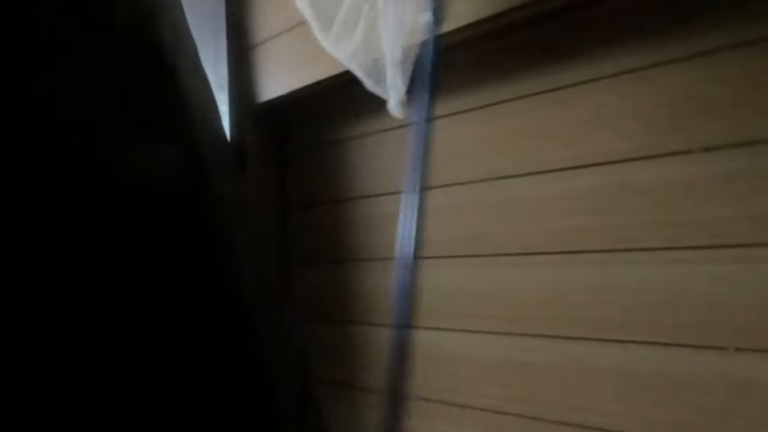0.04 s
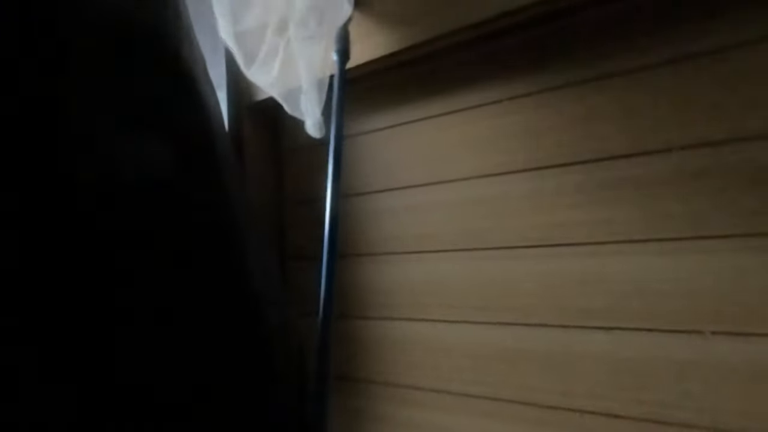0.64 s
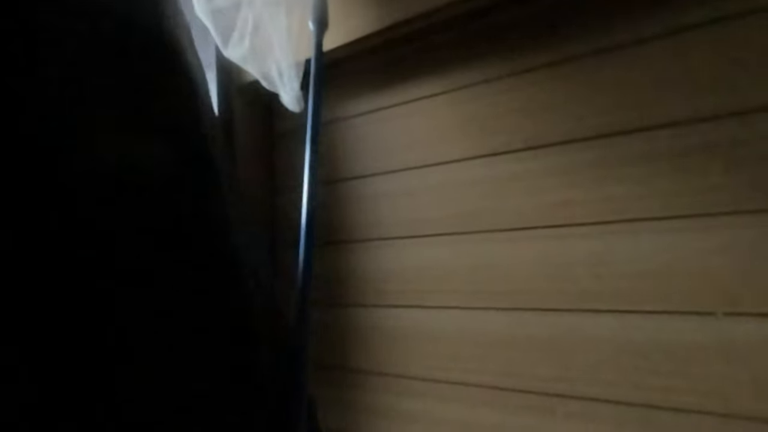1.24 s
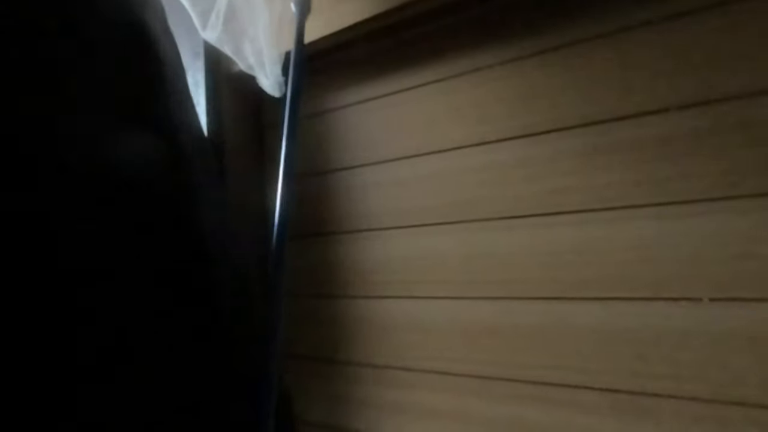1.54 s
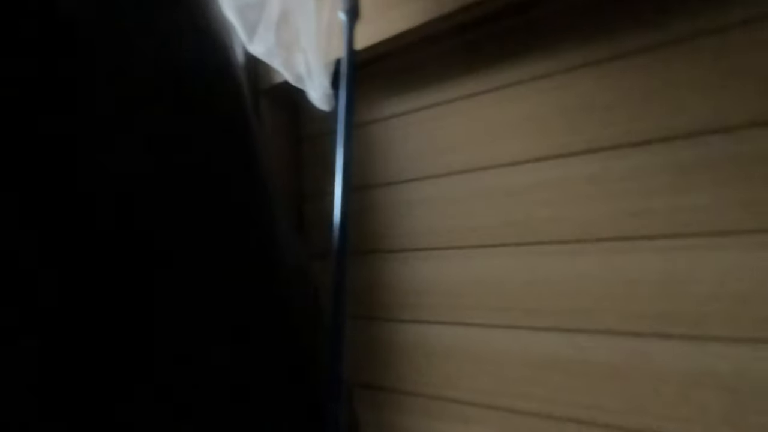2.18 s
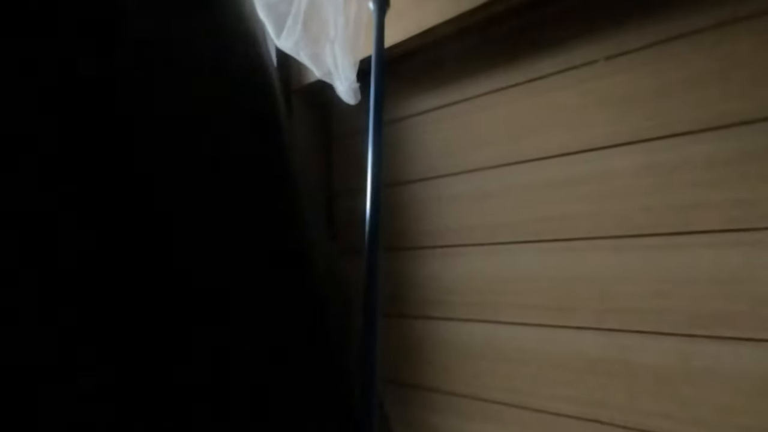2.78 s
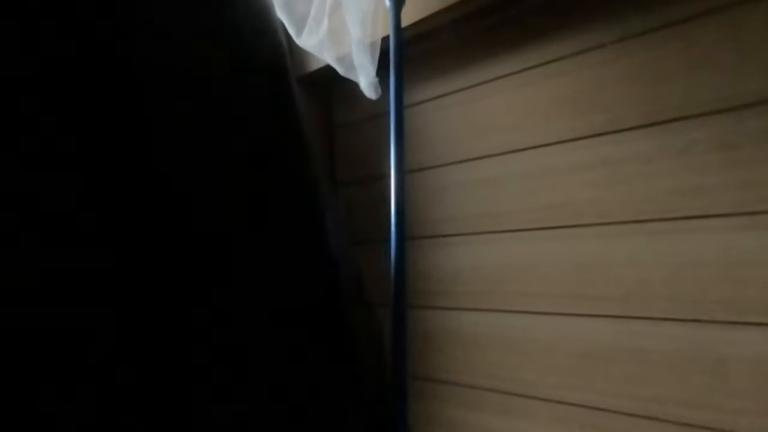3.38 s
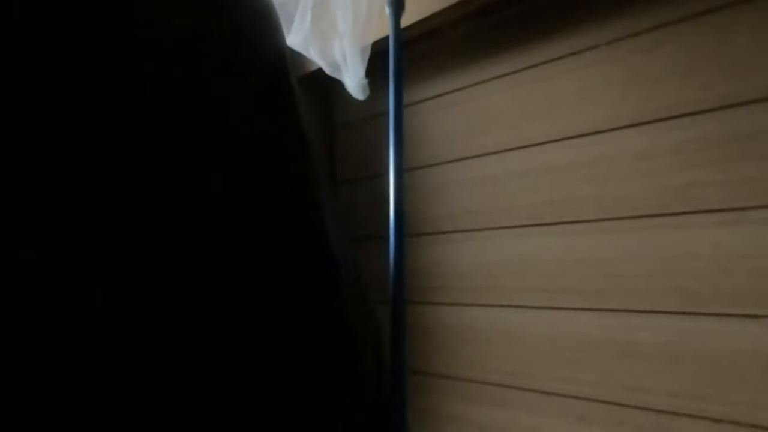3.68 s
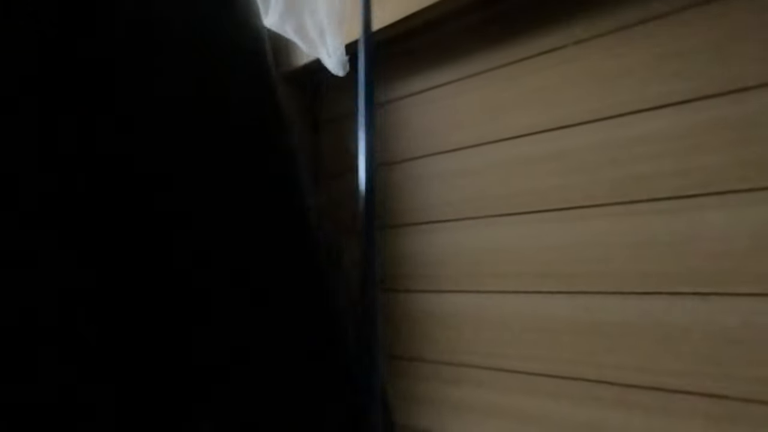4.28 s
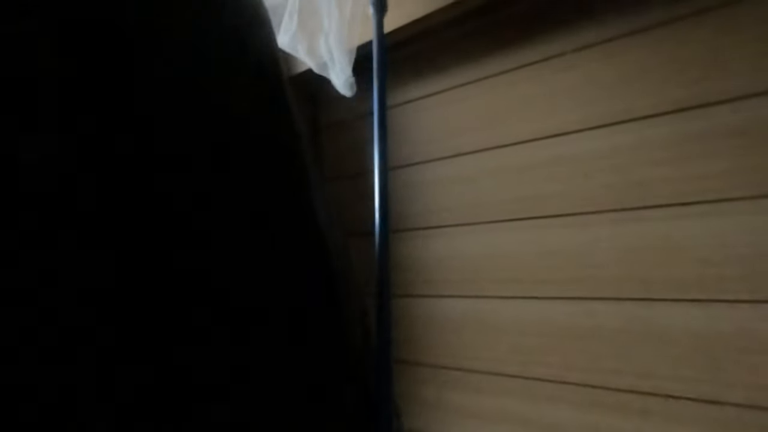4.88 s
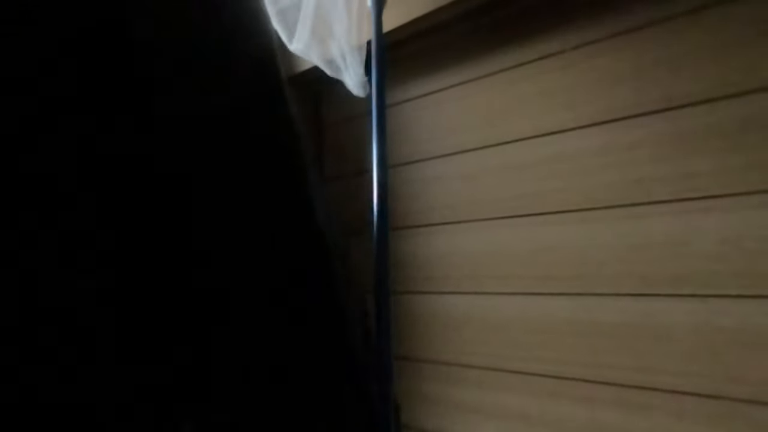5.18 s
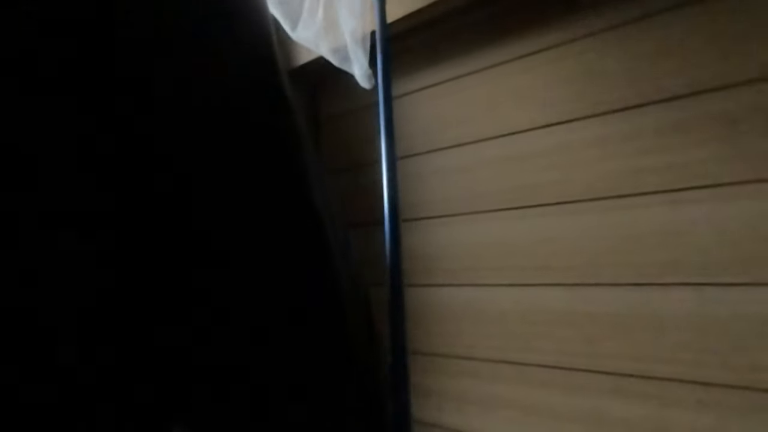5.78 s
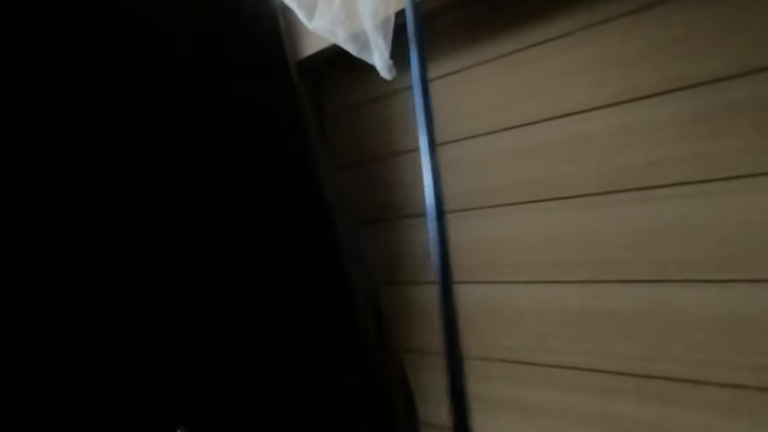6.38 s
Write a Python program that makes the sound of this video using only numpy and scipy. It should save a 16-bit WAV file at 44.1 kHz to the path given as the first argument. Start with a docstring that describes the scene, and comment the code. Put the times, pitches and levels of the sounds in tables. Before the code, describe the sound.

An insect net works along wooden wall boards close to the microphone, indoors. It starts with light knocks, rubbing and a short clatter, then falls nearly quiet. A firm knock follows, then a tiny squeak, a loud hollow bang and some smaller taps, and finally two hard bangs in quick succession. Soft scrapes of the frame and rustles of mesh fill the gaps, with a faint room hiss throughout.

```python
"""Insect net against a plank wall

A small room, with a phone's two microphones close to the wall. The net's pole and frame knock on the
boards, which boom and ring; the hardest blows overload the microphones. Between blows the frame scrapes
along the wood and squeaks once, and the mesh swishes, over a faint steady hiss."""
import sys
import numpy as np
from scipy import signal
from scipy.fft import rfft, irfft
from scipy.io import wavfile
from scipy.ndimage import uniform_filter1d

SR = 44100
rng = np.random.default_rng(int(sys.argv[2]) if len(sys.argv) > 2 else 0)


def generate_wav(sig):
    """Save sig (samples, or channels by samples) to the path in sys.argv[1] as 16-bit PCM at SR."""
    pcm = np.round(np.clip(np.atleast_2d(sig).T, -1, 1) * 32767).astype(np.int16)
    wavfile.write(sys.argv[1], SR, pcm)


N = 287973
RING_SAMPLES = 32768  # time given to one blow to die away

# Blows on the wall, close to the phone: start_s, level_db, contact_hz (low = soft),
# bass_cut_hz (high = glancing), click_db (relative to the wall's sound)
BLOWS = [(0.006, -43, 336, 85, -37), (0.1056, -18.5, 1680, 410, -16), (0.197, -26, 300, 310, -41),
         (0.7251, -33, 2010, 700, -29), (0.8213, -31.5, 1200, 27, -27), (0.833, -14.5, 473, 17, -30),
         (0.841, -27.5, 1500, 230, -19), (0.8701, -24, 2400, 450, -14), (3.2355, -14.5, 1920, 230, -15.5),
         (3.9565, -7, 2220, 80, -16.5), (4.362, -53.5, 1500, 340, -6), (4.378, -28, 850, 320, -27),
         (4.411, -26.5, 1270, 120, -21.5), (4.421, -19, 1660, 200, -38), (4.477, -47, 900, 240, -12),
         (4.5455, -31, 734, 160, -29.5), (4.569, -29, 390, 300, -35), (5.015, -52, 1500, 800, -27),
         (5.053, -38.5, 420, 290, -31), (5.3979, -8, 1580, 91, -25.5), (5.5702, -7, 3000, 126, -17)]
# Resonances of the planks: pitch_hz, peak_db, t60_s
PLANK_MODES = [(73, -6, .8), (84, -14, .6), (164, 2, .27), (183, -4, .21), (214, 1, .24), (258, -4, .22),
               (291, -1, .22), (318, -8, .19), (345, -10, .2), (409, -5, .19), (480, -9, .16),
               (546, -5, .15), (585, -12, .13), (682, -8, .13), (730, -14, .13), (830, -15, .1),
               (865, -11, .12), (950, -16, .11), (1065, -9, .11), (1135, -10, .09), (1192, 0, .115),
               (1248, -8, .1), (1433, -11, .11), (1564, -14, .08), (1645, -21, .08), (1993, -19, .075),
               (2115, -22, .055)]


def knocks(mode_db=-6.5, dense_db=-6, push_db=-6, return_db=-3.5, hard_db=-10, span_s=0.03):
    """Each blow pushes the wall and leaves it ringing; a soft one loses treble, a glancing one bass."""
    out = np.zeros((2, N + RING_SAMPLES))
    push = undb(push_db) * board_push()
    # after a hard blow the pole drops back with a dull thud, which fades for blows below hard_db
    drop_back = delay(cut(push, 300, "low", order=2), s=0.0395)
    for start_s, level_db, contact_hz, bass_cut_hz, click_db in BLOWS:
        thuds = push + undb(return_db + 0.7 * min(level_db - hard_db, 0)) * drop_back
        wall = thuds + undb(mode_db) * struck_modes(PLANK_MODES) + undb(dense_db) * dense_ring()
        wall = cut(wall, contact_hz, "low", order=2)
        wall = cut(wall, bass_cut_hz, "high", order=1)
        blow = unit(wall) + undb(click_db) * pole_click()
        gain = undb(level_db) * np.sqrt(span_s * SR / RING_SAMPLES)  # level is energy spread over span_s
        start = int(start_s * SR)
        out[:, start:start + RING_SAMPLES] += gain * blow
    return out[:, :N]


# Spectrum of the first push on a board: freq_hz, density_db
PUSH_SPECTRUM = [(30, -23), (105, -28.5), (150, 13), (300, 7), (480, -0.5), (750, -9.5), (1200, 3.5),
                 (1700, -24.5), (2700, -40.5), (15000, -24)]


def board_push(rebound_s=0.003666, rebound_share=0.5, floor_s=0.011, floor_share=0.35):
    """The board gives way in one short wave, swings again and is mirrored by the floor."""
    impulse = np.tile(signal.unit_impulse(RING_SAMPLES), (2, 1))
    wave = causal_colour(impulse, PUSH_SPECTRUM)
    return -unit(wave + rebound_share * delay(wave, rebound_s) + floor_share * delay(wave, floor_s))


def struck_modes(table, scatter_db=1.44, detune=0.0062, travel_s=0.001246):
    """A struck body rings; every contact point weights the modes a little differently."""
    t, out = np.arange(RING_SAMPLES) / SR, 0
    for k, (hz, peak_db, t60_s) in enumerate(table):
        pitch_draw, level_draw, phase_draw = rng.standard_normal(3)
        decay = np.log(1000) / t60_s
        mic_phase = np.arctan(undb(at(MIC_WIDTH, hz))) * phase_draw * np.array([[1], [-1]])
        ring = np.cos(2 * np.pi * hz * (1 + detune * pitch_draw) * t + mic_phase) * np.exp(-decay * t)
        # neighbouring modes swing against each other, so the ring builds up over a few ms
        out = out + (-1) ** k * undb(peak_db + scatter_db * level_draw) * decay * ring
    return unit(delay(out, travel_s))


# Dense small resonances of the wall and the room around it: freq_hz, density_db
DENSE_SPECTRUM = [(30, -65), (70, -2), (100, -24.5), (160, -1), (300, -5), (450, -5.5), (800, -7.5),
                  (1200, -19), (1500, -2), (2000, -40), (2700, -29), (4000, -36.5), (9000, -36),
                  (15000, -66)]
# Their decay: freq_hz, t60_s
DENSE_DECAY = [(60, 0.59), (160, 0.34), (420, 0.21), (1100, 0.11), (2900, 0.14), (8000, 0.1)]


def dense_ring():
    """Countless small resonances die away in half-octave bands; the lows stay longest."""
    t, out = np.arange(RING_SAMPLES) / SR, 0
    noise = rfft(mic_noise(RING_SAMPLES))
    octave = np.log2(np.maximum(freqs(t), 1))
    for hz in 40 * 2 ** np.arange(0, 9, .5):
        window = np.cos(np.pi / 2 * np.clip(2 * (octave - np.log2(hz)), -1, 1))
        band = irfft(noise * window, RING_SAMPLES) * np.exp(-np.log(1000) * t / at(DENSE_DECAY, hz))
        out = out + unit(band) * undb(at(DENSE_SPECTRUM, hz)) * np.sqrt(hz)
    return unit(out)


# Crack of the hard pole on wood, heard close: freq_hz, density_db
CRACK_SPECTRUM = [(200, -11.5), (1500, 19), (2100, 0), (2800, -1.5), (4000, 2.5), (5500, -7.5),
                  (8000, -12.5), (10000, -12.5), (12000, -26), (16000, -48)]
# Resonances of the hollow pole: pitch_hz, peak_db, t60_s
POLE_MODES = [(3210, -13, 0.033), (3775, 2.5, 0.043), (3940, 2, 0.029), (4150, 2, 0.035),
              (4460, -7.5, 0.037), (4890, -4.5, .035), (5600, -6.5, 0.043), (7200, -10, 0.039)]


def pole_click(fall_s=0.0017, tail_s=0.024, tail_db=-21, pole_db=-11, bounce_s=0.033, bounce_db=-26):
    """The hard pole cracks against the wood, rings for a moment and bounces once, faintly."""
    t = np.arange(RING_SAMPLES) / SR
    crack = unit(causal_colour(mic_noise(RING_SAMPLES) * np.exp(-t / fall_s), CRACK_SPECTRUM))
    # the room scatters the crack into a short, much quieter tail
    tail = unit(causal_colour(mic_noise(RING_SAMPLES) * np.exp(-t / tail_s), CRACK_SPECTRUM))
    tail *= np.sqrt(tail_s / fall_s)
    pole = struck_modes(POLE_MODES, scatter_db=0.5, detune=0.012, travel_s=0.00033)
    blow = crack + undb(tail_db) * tail + undb(pole_db) * pan(pole, left_db=2)
    return pan(blow + undb(bounce_db) * delay(blow, bounce_s), left_db=3)


# Strokes of the net along the wall: start_s, length_s, mesh_db, frame_db
NET_STROKES = [(0.034, 0.083, -60, -53), (0.096, 0.14, -51, -36.5), (.332, 0.085, -61.5, -47.5),
               (0.495, 0.1, -57, -44.5), (0.608, .13, -53.5, -39), (0.78, .11, -56.5, -43.5),
               (1.04, .085, -64, -52), (1.148, 0.13, -64, -48.5), (1.293, .18, -62.5, -50.5),
               (1.49, 0.19, -72, -56), (2.852, 0.029, -67, -51.5), (3.298, 0.052, -65, -52),
               (3.572, .085, -60.5, -52), (3.696, 0.071, -64, -52.5), (3.888, 0.11, -59.5, -48.5),
               (4.043, 0.086, -66.5, -52), (4.187, 0.076, -65, -53.5), (4.327, 0.15, -59, -53),
               (4.527, 0.047, -62, -46), (4.6, 0.065, -67, -50.5), (4.803, 0.039, -66, -53),
               (4.902, .055, -65, -50.5), (5.005, .07, -58.5, -49), (5.089, 0.07, -63, -50.5),
               (5.244, .055, -61.5, -51), (5.354, 0.12, -59, -46), (5.502, 0.14, -61, -46.5),
               (5.68, 0.041, -68, -53), (5.864, .05, -65, -55), (5.97, 0.036, -68, -56),
               (6.25, 0.1, -63, -51.5), (6.393, 0.13, -59, -48)]


def stroke_friction(attack_s=0.023, release_s=0.048, arch_db=3.5, lean_db=-59.5):
    """Strength of the mesh and frame friction: each stroke speeds up, swells at its middle and stops."""
    t, power = np.arange(N) / SR, np.zeros((2, N))
    for start_s, length_s, mesh_db, frame_db in NET_STROKES:
        moving = (t > start_s) & (t < start_s + length_s + release_s)
        age = t[moving] - start_s
        attack = np.minimum(age / attack_s, 1)
        release = np.minimum(1 - (age - length_s) / release_s, 1)
        arch = undb(arch_db * (np.sin(np.pi * age / (length_s + release_s)) - 1))
        power[:, moving] += (undb([[mesh_db], [frame_db]]) * attack * release * arch) ** 2
    power[1] += undb(lean_db) ** 2  # leaning on the wall, the frame rubs faintly even between strokes
    return np.sqrt(power)


# The frame dragging over the planks: freq_hz, density_db
SCRAPE_SPECTRUM = [(40, -34), (100, -7), (190, -2), (330, -4.5), (460, -12), (570, -6), (820, -14),
                   (1100, -6.5), (1560, -23), (2100, -27.5), (2700, -37.5), (3800, -37), (6000, -62),
                   (12000, -65)]


def frame_scrape(force, grain_db=2, judder_db=1, ring_db=-9, chafe_db=-6, light_touch_db=-54.5):
    """The frame catches on the grain in quick uneven slips, which also stir the boards."""
    slips = mic_noise(N) * undb(grain_db * walk(rate_hz=400) + judder_db * walk(rate_hz=35))
    rasp = unit(colour(slips, SCRAPE_SPECTRUM))
    boards = unit(signal.fftconvolve(slips, struck_modes(PLANK_MODES), axes=1)[:, :N])
    # a light touch only chafes the surface; pressing harder brings in the body of the wall
    chafe = unit(cut(cut(mic_noise(N), 1180, "high", order=4), 1210, "low", order=6))
    chafe /= 1 + force / undb(light_touch_db)
    return (rasp + undb(ring_db) * boards + undb(chafe_db) * chafe) * force


# The mesh brushing the wood, louder at the left microphone: freq_hz, density_db
SWISH_SPECTRUM = [(900, -16), (1500, 15), (2000, -1.5), (2700, 0.5), (3900, 7.5), (6000, -2.5),
                  (8000, -1.5), (10000, -2), (11500, -12), (15000, -19)]


def mesh_swish(force, gain_db=1, thread_db=0.5, flutter_db=0.5, folds_per_s=150, crinkle_s=0.0011):
    """Threads of the mesh flick over the wood in a fine dense rustle; small folds crinkle in it."""
    folds = (rng.random(N) < folds_per_s / SR) * rng.random(N)
    crinkles = undb(2) * signal.lfilter([1], [1, -np.exp(-1 / (crinkle_s * SR))], folds)
    threads = mic_noise(N) * undb(thread_db * walk(rate_hz=1500) + flutter_db * walk(rate_hz=42))
    rustle = unit(colour(threads * (1 + crinkles), SWISH_SPECTRUM))
    return pan(rustle, left_db=5.5) * force * undb(gain_db)


# Course of the frame's one faint squeak on the wall: time_s, pitch_hz, level_db
SQUEAK_PATH = [(3.76, 597, -60), (3.785, 622, -57), (3.81, 598, -40), (3.85, 554, -46.5),
               (3.89, 594, -47.5), (3.93, 600, -59)]


def frame_squeak(jitter=0.05, rough_db=2.5, board_db=-4):
    """The frame sticks and slips in a short, rough tone; its uneven slips shake the boards."""
    t = np.arange(N) / SR
    time_s, pitch_hz, level_db = np.transpose(SQUEAK_PATH)
    hz = np.interp(t, time_s, pitch_hz) * (1 + jitter * walk(rate_hz=300))
    tone = unit(sine(hz) * undb(rough_db * walk(rate_hz=110)))
    boards = unit(cut(cut(mic_noise(N), 260, "high", order=2), 440, "low", order=3))
    sounding = (t > time_s[0]) & (t < time_s[-1])
    return sounding * (tone + undb(board_db) * boards) * undb(np.interp(t, time_s, level_db))


# Room tone where the phone is: freq_hz, density_db
ROOM_SPECTRUM = [(25, -27), (45, -11), (80, -7.5), (130, 2.5), (190, 0.5), (380, -3.5), (520, -9),
                 (800, -10.5), (1200, -12.5), (1750, -22), (3000, -25), (4000, -27.5), (9500, -41),
                 (14000, -55)]


def room_tone(hiss_db=-49.52, whine_hz=3630, whine_db=-82.5, waver=0.0022):
    """The steady hiss of the small room, with a faint thin whine."""
    whine = unit(sine(whine_hz * (1 + waver * walk(rate_hz=40))))
    hiss = unit(colour(mic_noise(N), ROOM_SPECTRUM))
    return undb(hiss_db) * pan(hiss, left_db=0.87) + undb(whine_db) * whine


# Stereo width at the phone's two microphones: freq_hz, side_minus_mid_db
MIC_WIDTH = [(60, -45), (200, -22.5), (700, -17), (1290, -9), (1900, 0.5), (2500, 2), (15000, -5.5)]


def mic_noise(n):
    """Noise at both microphones: alike in the bass, largely unrelated in the treble."""
    mid, side = rng.standard_normal((2, n))
    share = undb(at(MIC_WIDTH, freqs(mid)))
    left_right = rfft(mid) + np.array([[1], [-1]]) * share * rfft(side)
    return irfft(left_right / np.sqrt(1 + share ** 2), n)


def undb(db):
    """Decibels to gain."""
    return 10 ** (np.asarray(db) / 20)


def unit(x):
    """Scale to rms 1."""
    return x / np.sqrt(np.mean(x ** 2))


def at(points, hz):
    """Read a table on a log-frequency axis."""
    f, value = np.transpose(points)
    return np.interp(np.log(np.maximum(hz, 1)), np.log(f), value)


def sine(hz):
    """A tone that follows a changing pitch."""
    return np.sin(2 * np.pi * np.cumsum(hz) / SR)


def freqs(x):
    """Frequencies of the spectrum of x."""
    return np.fft.rfftfreq(x.shape[-1], 1 / SR)


def colour(x, points):
    """Filter x by a (Hz, dB) curve."""
    return irfft(rfft(x) * undb(at(points, freqs(x))), x.shape[-1])


def causal_colour(x, points):
    """Filter x by a (Hz, dB) curve at minimum phase, so nothing sounds ahead of the attack."""
    n = x.shape[-1]
    cepstrum = irfft(np.log(undb(at(points, freqs(x)))), n)
    cepstrum[1:n // 2] *= 2
    cepstrum[n // 2 + 1:] = 0
    return irfft(rfft(x) * np.exp(rfft(cepstrum)), n)


def cut(x, hz, kind, order):
    """Low-pass or high-pass."""
    return signal.sosfilt(signal.butter(order, hz, kind, fs=SR, output="sos"), x)


def pan(x, left_db):
    """Make the left channel left_db louder than the right."""
    return x * undb(np.array([[left_db], [-left_db]]) / 2)


def walk(rate_hz):
    """Random levels, rate_hz a second, joined by ramps; rms 1."""
    hold = int(SR / rate_hz)
    steps = np.repeat(rng.standard_normal(N // hold + 1), hold)
    return unit(uniform_filter1d(steps, hold)[:N])


def delay(x, s):
    """The same sound s seconds later."""
    return np.pad(x, ((0, 0), (int(s * SR), 0)))[:, :x.shape[1]]


def scene():
    """The net works the wall close by, a little left of centre, in the quiet room."""
    mesh_force, frame_force = stroke_friction()
    wood = knocks() + frame_scrape(frame_force) + frame_squeak()
    return pan(wood, left_db=0.8) + mesh_swish(mesh_force) + room_tone()


def record(dry, bass_hz=25, top_hz=15700):
    """The phone drops the deepest bass, clips at full scale and cuts the top."""
    clipped = np.clip(cut(dry, bass_hz, "high", order=2), -1, 1)
    return signal.sosfilt(signal.ellip(8, .2, 70, top_hz, fs=SR, output="sos"), clipped)


dry = scene()
out = record(dry)
generate_wav(out)
```